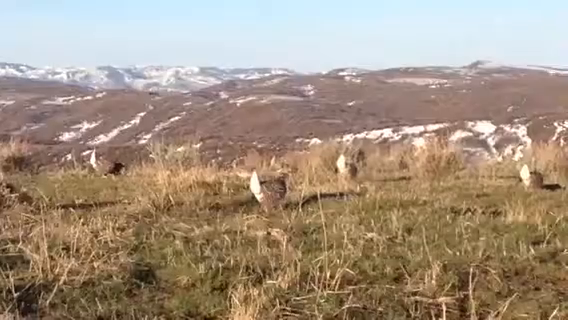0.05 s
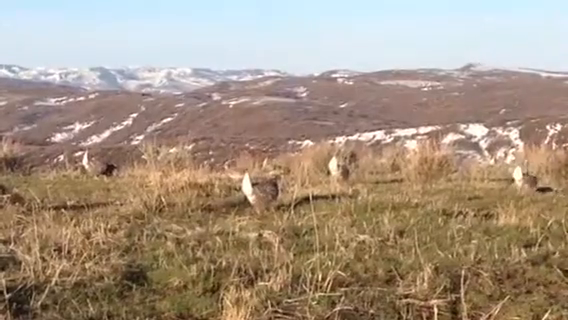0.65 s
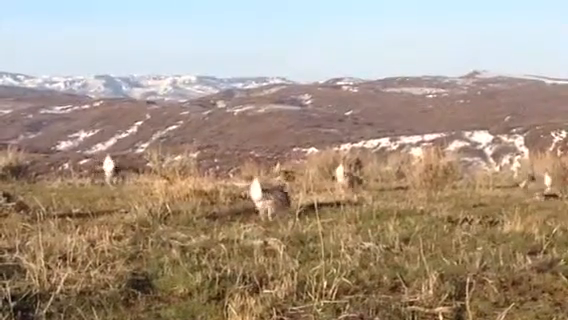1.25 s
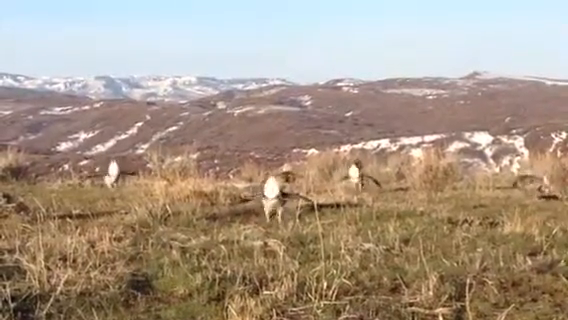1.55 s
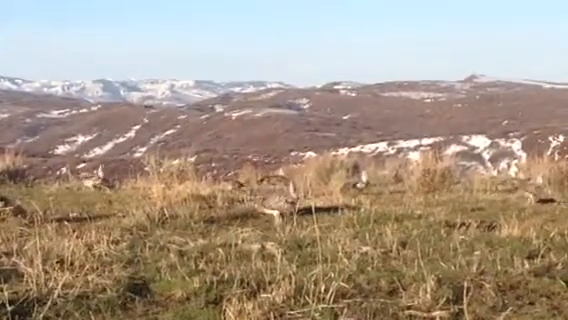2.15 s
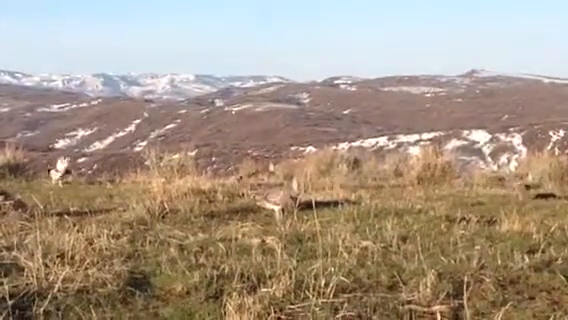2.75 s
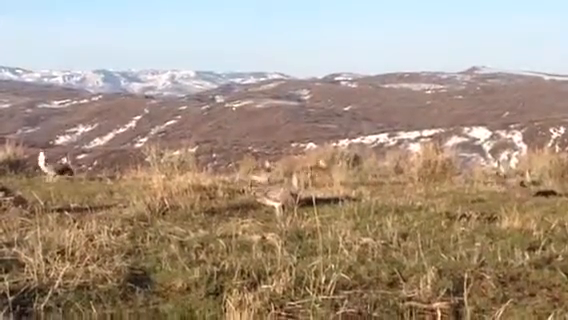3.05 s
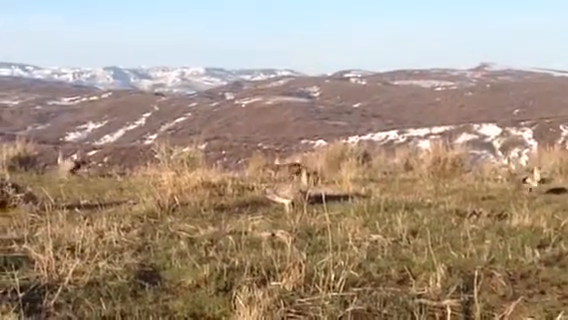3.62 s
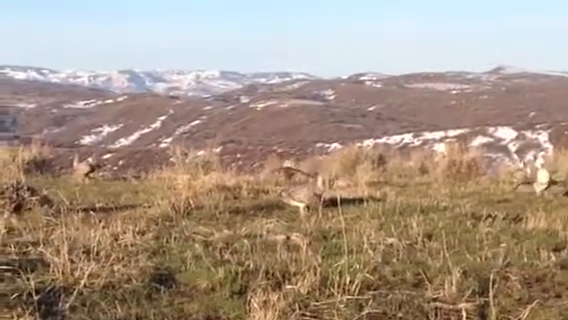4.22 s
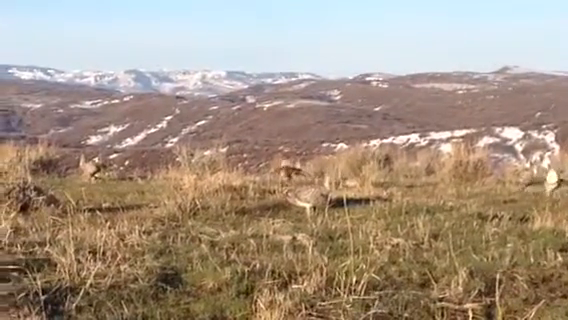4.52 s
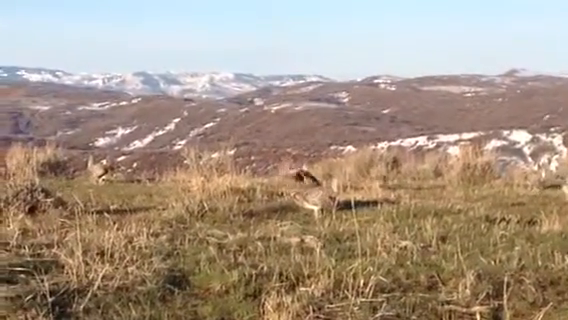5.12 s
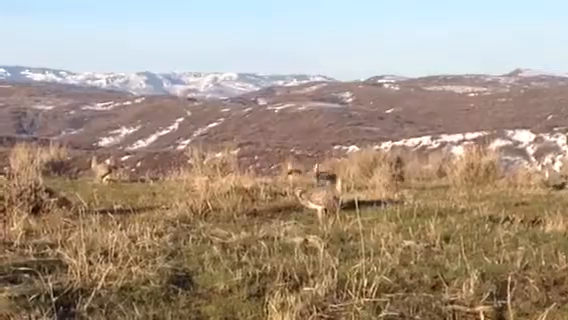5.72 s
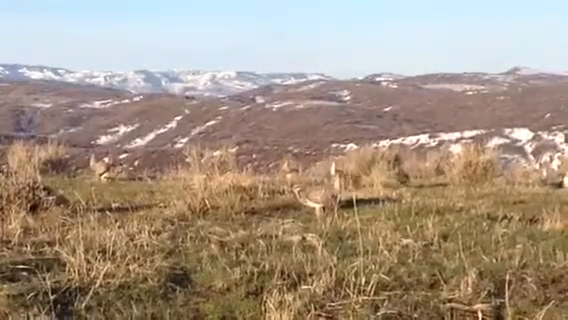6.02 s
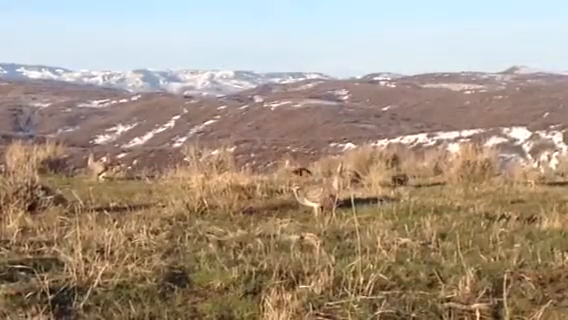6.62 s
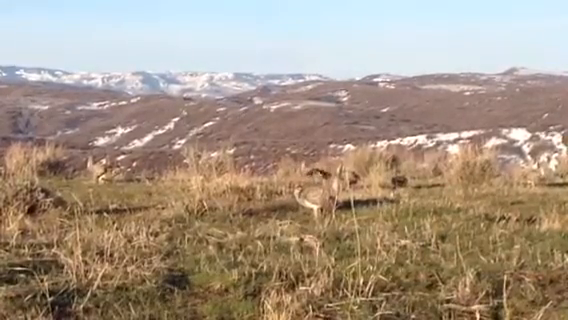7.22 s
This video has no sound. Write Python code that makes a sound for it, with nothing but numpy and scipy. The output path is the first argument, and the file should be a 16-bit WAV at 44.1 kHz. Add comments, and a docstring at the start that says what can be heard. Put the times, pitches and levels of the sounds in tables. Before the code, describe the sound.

Rapid feather rattling and soft foot drumming from dancing grouse, with repeated sharp squeaks, falling clucks and dry snaps in an open field.

```python
"""Sharp-tailed grouse call and dance some metres away on an open, almost windless field.
Each call is a rising two-voiced squeak from the syrinx that drops into a hollow, throat-resonant
cluck. Feet drum the turf, tail quills click and rustle, wings sweep the grass; other birds yelp.
Brush scatters the calls and clicks, and a slope returns a faint echo."""
import sys
import numpy as np
from scipy import signal
from scipy.fft import rfft, irfft, next_fast_len
from scipy.io import wavfile
from scipy.ndimage import uniform_filter1d

SR = 44100
rng = np.random.default_rng(int(sys.argv[2]) if len(sys.argv) > 2 else 0)


def master_out(mix):
    """Clip the mix to full scale and print it as 16-bit PCM to the path in sys.argv[1]."""
    frames = np.transpose(np.atleast_2d(mix))
    ceiling = np.clip(frames, -1, 1)
    pcm = np.round(ceiling * 32767).astype(np.int16)
    wavfile.write(sys.argv[1], SR, pcm)


N = 320607

# Table levels are relative; the functions add their own gains.
# flock activity (time [s], rustle [dB], distant feet [dB])
BUSTLE = [(0.0, -96, -75), (0.18, -86, -89), (0.47, -73, -68), (0.73, -68.5, -68), (1.19, -70, -61),
          (1.56, -54.5, -54.5), (1.72, -54, -54), (2.47, -58, -56.5), (3.12, -64.5, -61.5),
          (3.46, -57, -61.5), (3.75, -65.5, -72.5), (4.01, -64.5, -65), (4.43, -64, -69.5),
          (5.08, -60, -61), (6.14, -61, -63), (6.42, -55, -59), (6.9, -66.5, -65.5), (7.27, -60, -57)]
# wings on grass (centre [s], half length [s], level [dB])
WING_SWEEPS = [(1.59, .06, -63.5), (1.82, 0.15, -69), (2.449, 0.094, -56.5), (2.89, 0.043, -67),
               (4.59, 0.11, -67.5), (5.129, 0.078, -53.5), (5.623, 0.067, -55), (6.37, 0.085, -61),
               (6.8, 0.056, -66)]
# other birds (time [s], length [s], pitch [Hz], glide [Hz], level [dB])
YELPS = [(0.005, 0.076, 517, -160, -82.5), (3.08, 0.027, 2170, 0, -65.5), (3.648, 0.046, 2310, 792, -65),
         (3.804, 0.027, 1273, 46, -67.5), (2.619, 0.024, 1400, -200, -56.5), (3.336, 0.043, 780, -74, -61),
         (3.448, 0.065, 1294, 32, -65.5), (3.966, 0.051, 1410, -590, -60),
         (4.432, 0.041, 1180, -210, -67.5), (4.581, 0.03, 1586, -240, -55), (4.985, 0.053, 1285, -260, -67),
         (5.675, 0.029, 1146, -15, -53), (5.987, 0.011, 1410, -1000, -57), (6.634, 0.013, 1412, 85, -45.5),
         (6.647, 0.011, 1840, -19, -50.5), (6.659, 0.0098, 1250, -540, -54.5),
         (7.19, 0.013, 1424, -440, -57)]
# stamp bursts, about 19 stamps/s; positive lag: the bird speeds up
# (first [s], last [s], count, mid-burst lag [s], foot [dB], tail [dB])
STAMP_BURSTS = [(0.146, 0.727, 12, .0039, -60, -58), (0.27, 1.391, 22, 0, -52, -53),
                (0.95, 1.924, 20, .0052, -50, -55), (1.246, 2.315, 22, -.008, -47, -50),
                (2.016, 2.73, 15, .0013, -50, -54), (2.498, 3.316, 16, -.0095, -51, -55),
                (2.83, 3.209, 8, .0021, -51, -55), (3.196, 4.321, 22, .0035, -50, -49),
                (3.328, 3.604, 6, .0009, -54, -56), (3.674, 3.996, 7, .0015, -58, -54),
                (3.85, 4.249, 8, -.0025, -57, -55), (4.308, 5.387, 21, .0193, -49, -48),
                (4.63, 5.73, 22, .0033, -50, -51), (5.442, 5.859, 9, -.0025, -50, -51),
                (5.714, 6.23, 11, .0014, -48, -45), (6.1, 7.235, 22, 0, -50, -49),
                (6.344, 7.207, 17, .0091, -53, -54)]
# high chips, mostly just ahead of a call (time [s], level [dB])
CHIPS = [(.773, -45), (1.517, -41.5), (1.754, -41), (2.031, -36.5), (2.083, -44), (2.323, -44.5),
         (2.371, -42.5), (2.447, -36), (2.877, -44.5), (3.458, -36.5), (4.038, -38.5), (5.038, -40.5),
         (5.491, -37), (5.569, -35), (6.226, -39.5), (6.277, -38.5), (6.617, -42.5), (6.685, -35.5),
         (7.016, -52)]
# snaps without a chip (time [s], level [dB])
LONE_SNAPS = [(1.788, -41.5), (1.83, -33), (1.854, -34.5), (2.399, -36), (2.517, -39), (2.957, -36),
              (6.307, -33), (6.355, -36)]
# first voice (time [s], length [s], pitch [Hz], glide [Hz], level [dB], overtones [dB], break length [s])
SQUEAKS = [(0.84, 0.026, 2242, 141, -34.5, -16.5, 0), (1.58, 0.028, 2220, 257, -37.5, -15, 0),
           (1.836, 0.017, 2218, 280, -35.5, -10, 0.00042), (2.094, 0.022, 2240, 310, -35.5, -7.5, 0),
           (2.646, 0.016, 2163, 314, -34.5, -10.5, 0), (2.959, 0.032, 2122, -43, -37, -11, 0),
           (3.536, 0.019, 2206, 288, -35, -7.5, 0), (4.109, 0.023, 2244, 363, -33.5, -8, 0.0034),
           (4.483, 0.022, 2257, 282, -34.5, -5.5, 0.0037), (5.089, 0.015, 2260, 373, -35, -9, 0.013),
           (5.627, 0.017, 2235, 380, -35, -7, 0.014), (5.953, 0.034, 2180, -110, -37, -5.5, 0),
           (6.291, 0.016, 2240, 315, -31, -7.5, 0.0074), (6.372, 0.035, 2410, 327, -44.5, -5.5, 0),
           (6.749, 0.018, 2222, 315, -32.5, -3, 0.0039), (7.083, 0.013, 2244, 380, -34.5, -13, 0.012)]
# call endings (time [s], length [s], base pitch [Hz], end lift [Hz], swell [s], peak [dB], fade [dB],
# roughness [0-1])
CLUCKS = [(0.868, 0.047, 485, -68, 0.0097, -23, 14, 0), (1.005, 0.065, 372, 1, 0.0095, -61, 5, 0.3),
          (1.606, 0.061, 465, -41, 0.014, -23, 18.5, 0.31),
          (1.858, 0.073, 548, 31.5, 0.0055, -27, 23.5, 0.38),
          (2.117, 0.044, 449, 85.5, 0.01, -26.5, 10, 0.35),
          (2.414, 0.066, 365, 169, 0.0054, -37, 6.5, 0.33), (2.665, 0.035, 505, 37, 0.0084, -25, 7.5, 0.1),
          (2.992, 0.053, 424, 23, 0.0065, -45, 11.5, 0.45), (3.322, 0.061, 435, -6, 0.0023, -57.5, 12, 0.4),
          (3.553, 0.046, 517, 18, 0.014, -26, 7.5, 0.3), (4.128, 0.063, 390, -7.5, 0.022, -25.5, 10, 0.44),
          (4.238, 0.1, 395, -12, 0.0085, -53.5, 19.5, 0.45),
          (4.512, 0.037, 378.3, -2, 0.0078, -25, 9, 0.34),
          (4.548, 0.098, 474, -75, 0.0024, -40.5, 16.5, 0.52),
          (5.109, 0.064, 385, -40, 0.024, -27, 8, 0.51), (5.581, 0.062, 403, -54, 0.0042, -40, 8.5, 0.52),
          (5.655, 0.0347, 424, 175, 0.002, -36, 13, 0.31),
          (5.868, 0.096, 393, -43.5, 0.02, -36.5, 12, 0.37),
          (6.32, 0.033, 371.6, -52, 0.0098, -26, 13, 0.48),
          (6.401, 0.042, 402, -18, 0.0092, -44.5, 5.5, 0.24),
          (6.699, 0.05, 315.4, 47, 0.018, -37.5, 6, 0.56), (6.775, 0.03, 404, 133, 0.0073, -27, 11.5, 0.35),
          (7.112, 0.046, 363.6, -32, 0.012, -24, 15, 0.42), (7.142, 0.097, 371, 1, 0.0024, -49, 17, 0.45)]
# second voice (time [s], length [s], pitch [Hz], glide [Hz], level [dB], overtones [dB])
WHISTLES = [(1.576, 0.031, 2795, 96, -50, -1), (2.362, 0.059, 2730, 544, -59.5, 3),
            (2.706, 0.025, 2640, -5, -57, -11), (2.973, 0.028, 2830, 310, -56.5, -14),
            (3.459, 0.029, 2800, 35, -58.5, 3.5), (3.527, 0.015, 2730, 135, -54, -3),
            (4.115, 0.052, 2880, 83, -49, 2), (4.496, 0.064, 2863, -23, -51.5, 5.5),
            (4.552, 0.046, 2635, 28, -46, -5), (5.091, 0.052, 2830, 51, -49, 5.5),
            (5.564, 0.034, 2493, -43, -45.5, -8.5), (5.589, 0.023, 2834, -230, -49, 5),
            (5.841, 0.044, 2730, 435, -52, 3.5), (6.312, 0.02, 2790, 124, -50, 3),
            (6.683, 0.032, 2676, -110, -51, -3.5), (6.703, 0.034, 2240, -160, -46, -5),
            (7.166, 0.017, 2620, -100, -55.5, -10), (3.838, 0.03, 2525, -80, -70.5, 1)]

# vocal tract and breath spectra (frequency [Hz], level [dB])
THROAT = [(250, -13), (400, -6.5), (600, -20), (800, -11.5), (1000, -3), (1180, -1), (1400, -10.5),
          (1700, -16), (2100, -23), (2600, -23.5), (3200, -42), (5500, -45.5), (9000, -69.5)]
BEAK = [(2500, -16.5), (4000, -4.5), (4550, 0.5), (5100, 5.5), (5700, -5.5), (6200, -16.5), (6750, -2.5),
        (7500, -1), (8500, -14), (9400, -16.5), (11000, -43.5), (14000, -41)]
RASP = [(150, -47), (350, -4.5), (700, -1), (1150, -17), (1800, -17.5), (2600, -8.5), (3400, -14),
        (5300, -11.5), (7000, -21), (11000, -43.5)]
# plumage and snap spectra (frequency [Hz], level [dB])
FEATHERS = [(200, -23.5), (330, -7), (600, 0.5), (1000, -18), (1700, -13), (2600, 5), (3500, -4.5),
            (4900, 5), (6300, -7.5), (9000, -22.5)]
SWISH = [(3500, -7), (5500, -3), (7000, 0), (8500, -1), (10500, -14), (15000, -45)]
QUILL = [(400, -22.5), (620, -16), (1000, -63), (1800, -36.5), (2300, -13), (2700, 2.5), (3500, -5),
         (4400, -14), (5200, 2), (6200, -16.5), (8500, -16.5), (14000, -49.5)]
SNAP = [(1500, -25), (3000, -17), (4200, 2), (5500, -4.5), (7000, 3), (9000, -26.5), (14000, -37.5)]
# still air, distant feet and slope echo spectra (frequency [Hz], level [dB])
STILL_AIR = [(30, -1.5), (100, -8), (300, -1.5), (600, -12.5), (1200, -18), (3000, -17), (15000, -22)]
FAR_FEET = [(60, -54.5), (110, -33.5), (150, -4.5), (200, 0), (250, -5.5), (330, -30.5), (900, -64.5)]
SLOPE = [(300, 13), (1300, -12), (2500, -1), (6000, 0)]

BAND_LIMIT_HZ = 15400


def amp(db):
    """dB to gain."""
    return 10 ** (np.asarray(db) / 20)


def unit_rms(x):
    """Scale to rms 1."""
    return x / np.sqrt(np.mean(x ** 2) + 1e-20)


def spectrum_db(spectrum, hz):
    """Level at hz, interpolated over log frequency."""
    points_hz, db = np.transpose(spectrum)
    return np.interp(np.log(hz + 1), np.log(points_hz), db)


def add(mix, at_s, sound):
    """Mix a sound in at at_s."""
    part = mix[max(round(at_s * SR), 0):][:len(sound)]
    part += sound[:len(part)]


def noise(spectrum, size):
    """Shaped noise, rms 1."""
    n = next_fast_len(size, True)
    gain = amp(spectrum_db(spectrum, np.fft.rfftfreq(n, 1 / SR)))
    return unit_rms(irfft(rfft(rng.standard_normal(n)) * gain, n)[:size])


def wobble(size, cutoff_hz):
    """Low-passed random motion, rms 1."""
    n = next_fast_len(size, True)
    rolloff = 1 + (np.fft.rfftfreq(n, 1 / SR) / cutoff_hz) ** 4
    return unit_rms(irfft(rfft(rng.standard_normal(n)) / rolloff, n)[:size])


def arch(mid_hz, glide_hz, bow_hz):
    """Start, middle and end pitch of a bowed glide."""
    return mid_hz - glide_hz / 2 - bow_hz, mid_hz, mid_hz + glide_hz / 2 - bow_hz


def syrinx(length_s, pitches_hz, overtone_db, jitter, edge_s=.004, hiss_db=-19, flicker_db=3):
    """One side of the syrinx whistles a pitch arch, with hiss; the beak colours its overtones."""
    t = np.arange(0, length_s + edge_s, 1 / SR)
    progress = t / t[-1]
    hz = np.polyval(np.polyfit([0, .5, 1], pitches_hz, 2), progress)
    phase = 2 * np.pi * np.cumsum(hz * (1 + jitter * wobble(len(t), 580))) / SR
    overtones = np.zeros(len(t))
    for k in range(2, 6):
        gain = amp(spectrum_db(BEAK, k * hz) + flicker_db * wobble(len(t), 110))
        overtones += gain * (k * hz < BAND_LIMIT_HZ) * np.cos(k * phase + k * k)
    hiss = amp(hiss_db) * noise(SWISH, len(t))
    swell = np.sqrt(np.sin(np.pi * progress).clip(0)) * signal.windows.tukey(len(t), .2)
    return np.sqrt(2) * unit_rms(swell) * (np.cos(phase) + amp(overtone_db) * swell * (overtones + hiss))


def hoarse_note(length_s, pitches_hz, overtone_db):
    """A breathy, unsteady syrinx note that swells and fades."""
    tone = syrinx(length_s, pitches_hz, overtone_db, jitter=.019, hiss_db=-11)
    envelope = signal.windows.tukey(len(tone), .6) * (1 + .23 * wobble(len(tone), 200))
    return tone * unit_rms(envelope)


def flock(grain_db=5, flicks_per_s=20, flick_decay_s=.0018):
    """The other dancers: feather rustle, quill flicks, a blur of feet, swishing wings."""
    t = np.arange(N) / SR
    times_s, rustle_db, feet_db = np.transpose(BUSTLE)
    activity = amp(np.interp(t, times_s, rustle_db))
    stamping = amp(np.interp(t, times_s, feet_db))
    sweeps = sum(amp(db) * np.exp(-((t - at_s) / half_s) ** 2) for at_s, half_s, db in WING_SWEEPS)
    rustle = unit_rms(noise(FEATHERS, N) * amp(grain_db * wobble(N, 90)))
    swish = unit_rms(noise(SWISH, N) * amp(grain_db * wobble(N, 180)))
    hits = (rng.random(N) < flicks_per_s / SR) * rng.uniform(.28, 1, N)
    flicks = signal.lfilter([1], [1, -np.exp(-1 / (flick_decay_s * SR))], hits) * noise(QUILL, N)
    drumming = stamping * noise(FAR_FEET, N)
    wings = (amp(-16) * activity + sweeps) * swish
    return activity * (rustle + amp(2) * flicks) + amp(-3) * drumming + amp(-2) * wings


def yelps():
    """Birds farther off: soft, nearly pure glides, mostly falling."""
    out = np.zeros(N)
    for at_s, length_s, hz, glide_hz, db in YELPS:
        add(out, at_s, amp(db) * hoarse_note(length_s, arch(hz, glide_hz, bow_hz=15), overtone_db=-15))
    return out


def dance(jitter_s=.0007, foot_lag_s=.0019, foot_spread_db=1.95, tail_spread_db=1.5, warm_up_s=.12):
    """Near-even stamps, each with a tail flick. Returns steps and flicks as (time [s], level [dB])."""
    steps, flicks = [], []
    for first_s, last_s, count, lag_s, foot_db, tail_db in STAMP_BURSTS:
        late, foot, tail = rng.standard_normal((count, 3)).T
        progress = np.linspace(0, 1, count)
        drift_s = lag_s * (1 - (2 * progress - 1) ** 2)
        times_s = first_s + (last_s - first_s) * progress + jitter_s * late + drift_s
        effort_db = -3.5 * np.exp(-(times_s - first_s) / warm_up_s)
        steps += zip(times_s + foot_lag_s, foot_db + effort_db + foot_spread_db * foot)
        flicks += zip(times_s, tail_db + effort_db + tail_spread_db * tail)
    return steps, flicks


def clicks(events, spectrum, rise_s, decay_s):
    """Stiff parts knock together: one brief noise burst per event."""
    out, t = np.zeros(N), np.arange(-.008, .016, 1 / SR)
    envelope = np.exp(np.minimum(t / rise_s, -t / decay_s))
    for at_s, db in events:
        add(out, at_s + t[0], amp(db) * envelope * noise(spectrum, len(t)))
    return out


def quill_ring(flicks, ring_hz=2620, width_s=.0013, spread=.065):
    """Each tail flick sets the quills ringing for a few ms."""
    out, t = np.zeros(N), np.arange(-.008, .012, 1 / SR)
    envelope = np.exp(-.5 * (t / width_s) ** 2)
    for (at_s, db), (detune, turns) in zip(flicks, rng.standard_normal((len(flicks), 2))):
        ring = np.cos(2 * np.pi * (ring_hz * (1 + spread * detune) * t + turns))
        add(out, at_s + t[0], amp(db) * envelope * ring)
    return out


def feet(steps, turf_hz=180, rise_s=.0058, decay_s=.0051, spread=.048):
    """Each stamp gives the turf a dull thump a few cycles long."""
    out, t = np.zeros(N), np.arange(-.02, .03, 1 / SR)
    envelope = np.exp(-.5 * (t / np.where(t < 0, rise_s, decay_s)) ** 2)
    for (at_s, db), (detune, shift) in zip(steps, rng.standard_normal((len(steps), 2))):
        hz = turf_hz * (1 + spread * np.clip(detune, -1, 2))
        add(out, at_s + t[0], amp(db) * envelope * np.cos(2 * np.pi * (hz * t + .11 * shift)))
    return out


def chips(length_s=.0027, pitch_hz=7160, spread=.025):
    """Very short, high upward flicks of the voice."""
    out = np.zeros(N)
    for (at_s, db), hz in zip(CHIPS, pitch_hz * (1 + spread * rng.standard_normal(len(CHIPS)))):
        chip = syrinx(length_s, (hz * .93, hz, hz * 1.05), overtone_db=-40, jitter=.035)
        add(out, at_s - len(chip) / SR / 2, amp(db) * chip * np.hanning(len(chip)))
    return out


def snaps(delay_s=.0145, offset_db=-.5):
    """Dry snaps: one after each chip, a few alone."""
    after_chips = [(at_s + delay_s, db + offset_db) for at_s, db in CHIPS]
    return clicks(LONE_SNAPS + after_chips, SNAP, rise_s=.00013, decay_s=.0012)


def squeaks(scoop_s=.0035, lead_s=.002, break_hz=3400, crack_hz=6800):
    """First voice: scoops up, jumps to its main pitch, may crack into a higher register at the end."""
    out = np.zeros(N)
    for at_s, length_s, hz, glide_hz, db, overtone_db, break_s in SQUEAKS:
        start_s = at_s - lead_s
        scoop = syrinx(scoop_s, (1150, 1535, 1620), overtone_db=-22, jitter=.02)
        add(out, start_s - scoop_s, amp(db - 7) * scoop * np.linspace(.2, 1.5, len(scoop)))
        bow_hz = 139 * (1 - glide_hz / 343)  # steep rises run straighter
        add(out, start_s, amp(db) * syrinx(length_s, arch(hz, glide_hz, bow_hz), overtone_db, jitter=.007))
        if break_s > 0:
            top = syrinx(break_s, (break_hz * .98, break_hz, break_hz * 1.01), overtone_db=-9, jitter=.009)
            crack = syrinx(.00084, [crack_hz] * 3, overtone_db=-26, jitter=.031)
            add(out, start_s + length_s, amp(db - 6) * top)
            add(out, start_s + length_s - lead_s, amp(db - 7) * crack * np.hanning(len(crack)))
    return out


def clucks(top_hz=1150, pop_hz=621, pop_s=.008, release_s=.024, sag=.12,
           dip_db=6, dip_s=.01, dip_width_s=.0025):
    """The pitch plunges; the voice pops open, catches, then holds a hollow note that frays and fades."""
    out, k = np.zeros(N), np.arange(1, 17)[:, None]
    for at_s, length_s, base_hz, lift_hz, swell_s, peak_db, fade_db, roughness in CLUCKS:
        t = np.arange(0, length_s + release_s, 1 / SR)
        fall_s = .0095 * (1 - np.exp(-swell_s / .008))
        # near pop_hz the second harmonic meets the throat resonance
        plunge = np.tanh((pop_hz - base_hz) / (top_hz - base_hz) * np.exp((swell_s - t) / fall_s))
        hz = base_hz + (top_hz - base_hz) * plunge + lift_hz * np.minimum(t / length_s, 1) ** 3
        hz *= 1 - sag * np.maximum(t - length_s, 0) / release_s
        fray = np.clip(roughness, .2, .5) * np.interp(t - swell_s, [-dip_s, 0, dip_s], [1.1, .4, 1.1])
        hz *= 1 + fray * (.075 * wobble(len(t), 300) + .06 * wobble(len(t), 50))
        phase = 2 * np.pi * np.cumsum(hz) / SR
        lag_rad = 2.52 * np.arctan((k * hz - 1170) / 260) + k * k / 2  # throat rings after each pulse
        voice = (amp(spectrum_db(THROAT, k * hz)) * np.cos(k * phase - lag_rad)).sum(0)
        split = .78 * np.cos(phase / 2)  # strong and weak pulses alternate
        voice *= 1 + fray * (.6 * wobble(len(t), 180) + split)
        rasp = amp(-10) * fray * noise(RASP, len(t)) * (1 + .5 * np.cos(phase))  # one air puff a cycle
        end_db = peak_db - fade_db
        knees_s = [0, max(swell_s - pop_s, swell_s / 2), swell_s, length_s, length_s + release_s]
        level_db = np.interp(t, knees_s, [peak_db - 15, peak_db - 7, peak_db, end_db, end_db - 21.5])
        level_db -= dip_db * np.exp(-((t - swell_s - dip_s) / dip_width_s) ** 2)
        envelope = uniform_filter1d(amp(level_db), size=220) * np.minimum(t / .0011, 1)
        add(out, at_s, envelope * (voice + rasp))
    return signal.sosfilt(signal.butter(4, 220, "highpass", fs=SR, output="sos"), out)


def whistles():
    """Second voice: thin, arched, reedy."""
    out = np.zeros(N)
    for at_s, length_s, hz, glide_hz, db, overtone_db in WHISTLES:
        add(out, at_s, amp(db) * hoarse_note(length_s, arch(hz, glide_hz, bow_hz=80), overtone_db))
    return out


def field(x, scatter_db=-19, t60_s=.2, echo_db=-34, echo_s=.12, echo_width_s=.027):
    """Grass and brush scatter a short tail; a slope returns a dull, smeared echo."""
    t = np.arange(SR // 2) / SR
    near = rng.standard_normal(len(t)) * amp(-60 * t / t60_s) * (t > .004)
    far = noise(SLOPE, len(t)) * np.exp(-abs(t - echo_s) / echo_width_s)
    response = amp(scatter_db) * near / np.linalg.norm(near) + amp(echo_db) * far / np.linalg.norm(far)
    return x + signal.fftconvolve(x, response)[:N]


def scene():
    """Calls and dance on the field, over still air."""
    steps, flicks = dance()
    calls = amp(-3) * squeaks() + amp(-.9) * whistles() + amp(-.7) * yelps()
    calls += amp(1.14) * clucks() + amp(-7) * chips()
    quills = amp(-5.5) * clicks(flicks, QUILL, rise_s=.0017, decay_s=.002) + amp(-3) * quill_ring(flicks)
    birds = field(calls + quills + amp(-2) * snaps()) + amp(-2.6) * feet(steps) + flock()
    return (birds + amp(-73) * noise(STILL_AIR, N))[None]


def record(dry, low_cut_hz=112):
    """Microphone low cut, edge fades, band limit."""
    thin = signal.sosfilt(signal.butter(5, low_cut_hz, "highpass", fs=SR, output="sos"), dry)
    faded = thin * signal.windows.tukey(N, .002)
    lowpass = signal.firwin(511, BAND_LIMIT_HZ, window=("kaiser", 9), fs=SR)
    return signal.oaconvolve(faded, lowpass[None], "same")


dry = scene()
out = record(dry)
master_out(out)
```